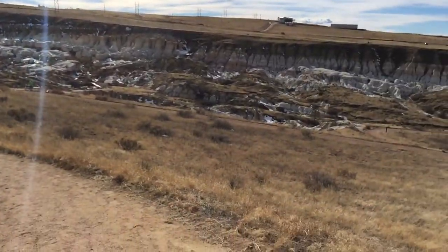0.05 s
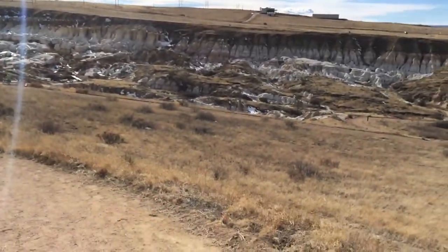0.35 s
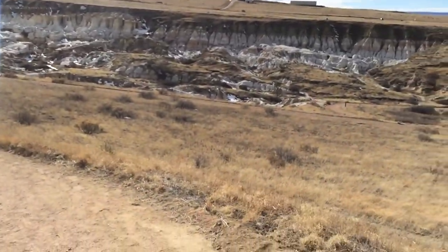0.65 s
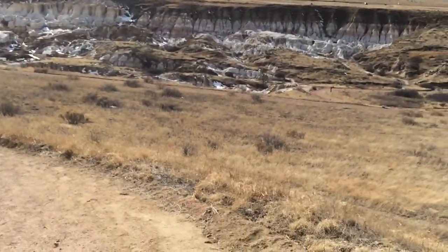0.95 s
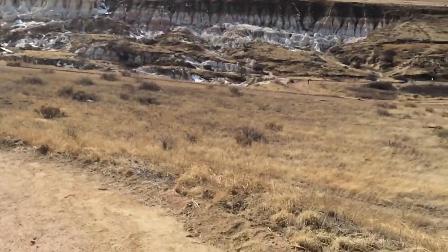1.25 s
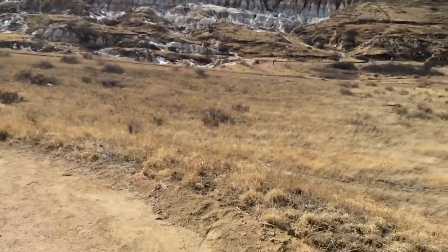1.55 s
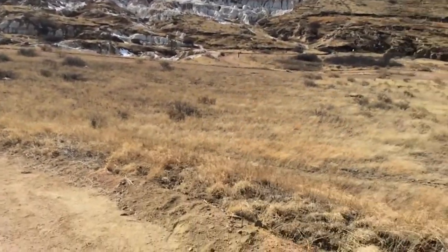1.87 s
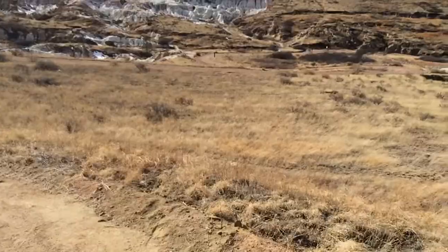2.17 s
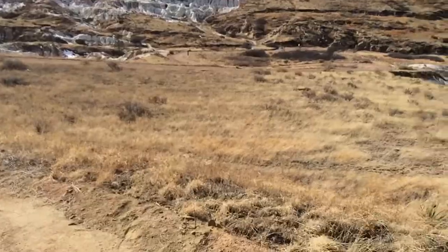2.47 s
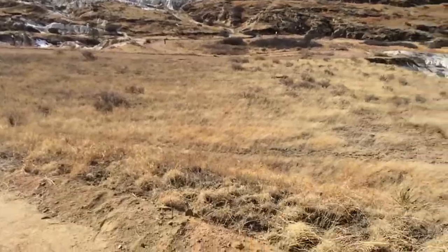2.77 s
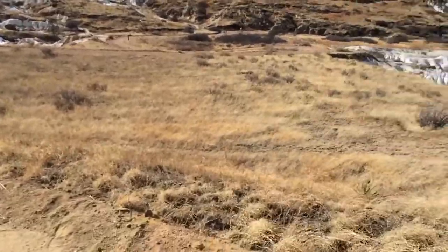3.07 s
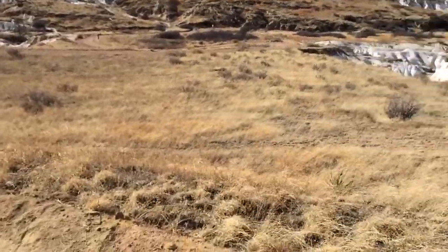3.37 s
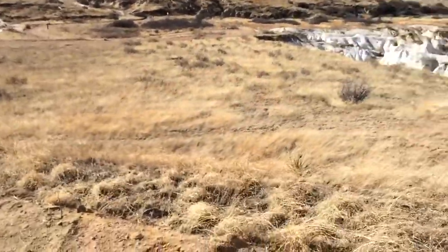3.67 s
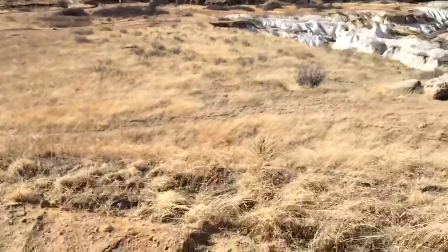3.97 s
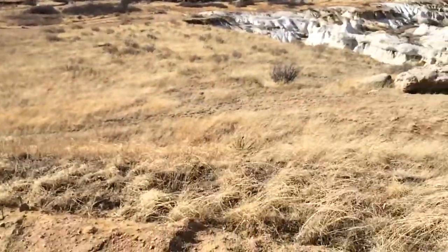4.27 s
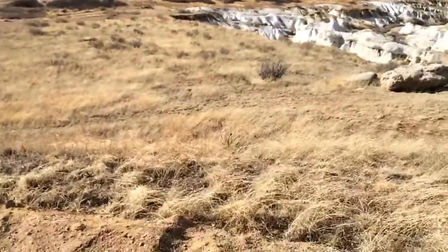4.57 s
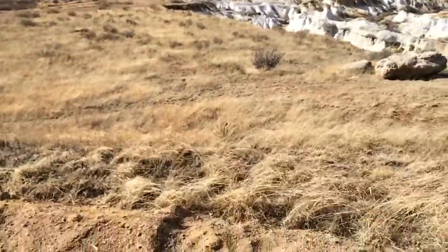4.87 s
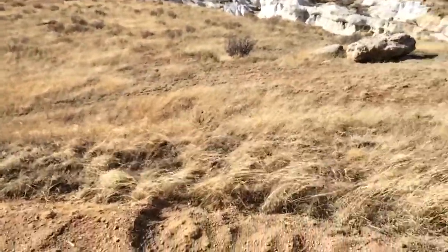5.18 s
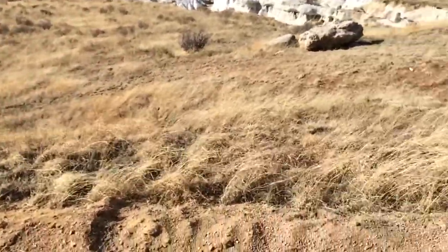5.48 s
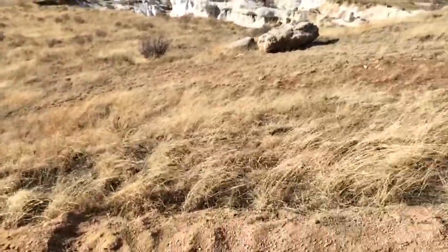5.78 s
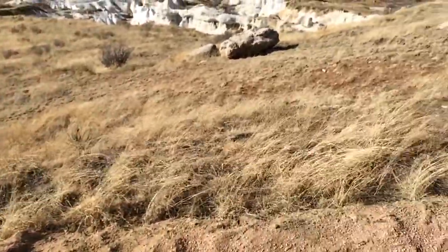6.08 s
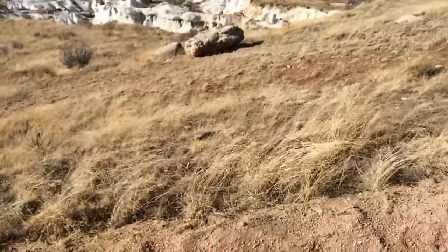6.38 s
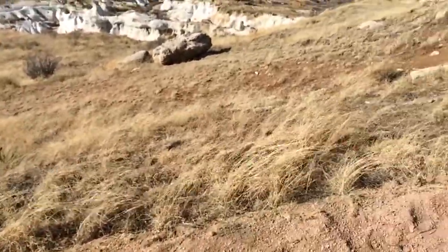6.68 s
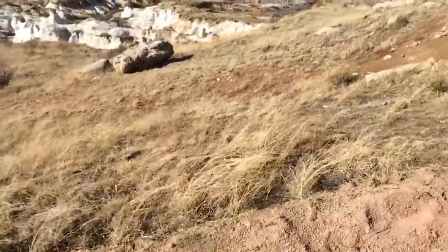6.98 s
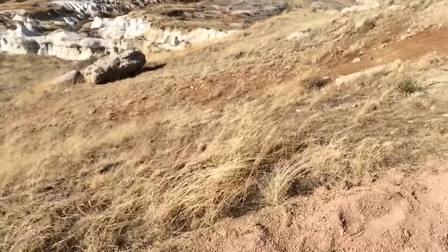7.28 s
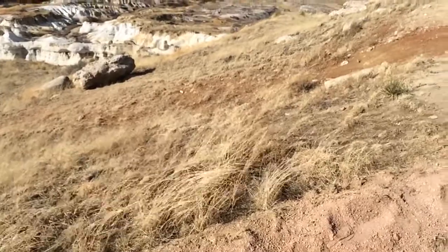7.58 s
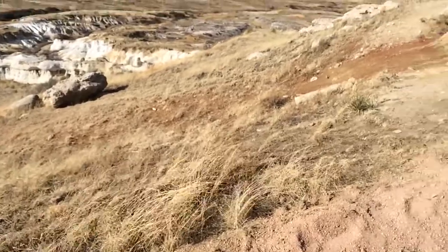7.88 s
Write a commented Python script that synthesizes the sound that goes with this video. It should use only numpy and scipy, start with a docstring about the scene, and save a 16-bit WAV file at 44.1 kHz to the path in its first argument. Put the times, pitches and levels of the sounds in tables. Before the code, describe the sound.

Strong wind on an open grassy hillside buffets a small camera microphone for about eight seconds. From the start, irregular gusts make a low rumble and rough churning, broken by short thuds and slaps. A softer airy hiss runs underneath, with a very faint rustle of dry grass. From about 2 to 4.5 seconds the churning eases and the wind is mostly deep rumble with a few booming lumps. At about 3.6 seconds a faint, breathy whistle rises and falls once. Hard thumps return around 5 seconds. Near 5.7 seconds the wind turns to hit the microphone head-on: the hiss drops and the sound becomes a louder, brighter, ragged tearing that continues to the end. The hardest gusts in this last part overload the microphone slightly, adding a faint crackling rasp.

```python
"""Strong wind on an open grassy hillside blows across the port (opening) of a small camera microphone.
From the start, eddies (swirls of air) rumble and thud, air hisses in the port and grass rustles faintly.
At about 3.6 s the air catches an edge and whistles once. Near 5.7 s the wind turns to meet the port
head-on: the hiss drops and the wind tears at the port to the end, with a faint rasp where the hardest
gusts overload the microphone. All along, the recorder's limiter turns down the loudest peaks."""
import sys
import numpy as np
from scipy import signal
from scipy.fft import rfft, irfft, next_fast_len
from scipy.io import wavfile
from scipy.ndimage import uniform_filter1d, minimum_filter1d, map_coordinates

SR = 44100
rng = np.random.default_rng(int(sys.argv[2]) if len(sys.argv) > 2 else 0)


def dump(signal):
    """Clip the signal to [-1, 1] and save it as 16-bit WAV at the path in sys.argv[1]."""
    limited = np.clip(np.atleast_2d(signal).T, -1, 1)
    pcm = np.round(limited * 32767).astype(np.int16)
    wavfile.write(sys.argv[1], SR, pcm)


N = 358974
TIME = np.arange(N) / SR

# Levels in the tables are relative: the functions scale them further.
# The steady breeze: time_s, hiss_db, grass_db
BREEZE_LEVELS = [(0, -42, -74), (.15, -41, -73), (.55, -34, -66), (.75, -36, -69), (1.15, -30.5, -57.5),
                 (1.35, -36, -65), (1.9, -35.5, -68.5), (2.25, -31.5, -65), (2.7, -34, -66),
                 (2.82, -38, -63.5), (3.17, -37, -63.5), (3.27, -33, -64.5), (3.7, -34.5, -58),
                 (4.05, -34.5, -61.5), (4.22, -40, -67), (4.55, -34.5, -61), (5.2, -41, -69.5)]
# The note of air catching an edge: time_s, pitch_hz, level_db
WHISTLE_NOTE = [(3.52, 3150, -66), (3.6, 3400, -57), (3.64, 3850, -48), (3.68, 3300, -44.5),
                (3.75, 2800, -52), (3.82, 2700, -75)]
# Gusts that strike the port: start_s, length_s, rumble_db, turbulence_db
PORT_GUSTS = [(0, 0.28, -20.5, -20), (0.284, 0.2, -15, -17.5), (0.513, 0.18, -18.0, -19.5),
              (0.817, 0.044, -18, -18), (0.883, 0.105, -13, -22), (1.037, 0.266, -15.5, -18.0),
              (1.308, 0.055, -24, -22.5), (1.53, 0.17, -17, -18), (1.784, 0.21, -18.5, -19),
              (2.173, 0.17, -17.0, -27), (2.516, 0.09, -16.5, -34), (2.633, 0.22, -16.0, -30),
              (2.966, 0.23, -14.5, -31), (3.206, 0.12, -16.5, -33), (3.387, 0.12, -14.5, -33),
              (3.504, 0.1, -16.5, -42), (3.926, 0.028, -14, -34), (4.018, 0.32, -15.0, -29.5),
              (4.444, 0.13, -18, -23.5), (4.626, 0.1, -17, -23), (4.88, 0.14, -14.5, -20.5),
              (5.158, 0.16, -26, -22), (5.319, 0.037, -12, -13), (5.438, 0.078, -24, -17),
              (5.529, 0.047, -34, -16.5), (5.633, 0.058, -27, -16.5), (5.734, 0.067, -15.5, -16.0),
              (5.851, 0.18, -20.0, -15.5), (6.077, 0.025, -24.0, -11), (6.146, 0.21, -28, -15.5),
              (6.367, 0.459, -18, -13.5), (6.88, 0.051, -14, -15.5), (6.946, 0.16, -22, -13),
              (7.175, 0.22, -14.5, -13.5), (7.426, 0.11, -21, -15.0), (7.539, 0.279, -19.5, -17),
              (7.847, 0.093, -15, -15.5), (7.956, 0.25, -21.5, -19.5)]
# Moments when the microphone overloads: start_s, length_s, level_db
OVERLOADS = [(1.242, 0.027, -56), (5.859, 0.027, -58), (5.911, 0.03, -60), (6.013, 0.031, -59.5),
             (6.074, 0.014, -61), (6.379, .055, -63.5), (6.5, .16, -58), (6.677, .07, -52),
             (6.837, .045, -62), (6.903, .03, -61.5), (6.971, 0.035, -48.5), (7.206, 0.098, -60.5),
             (7.349, 0.046, -56), (7.419, .075, -56.5), (7.561, .032, -60), (7.873, .041, -52.5),
             (8.008, .09, -58.5)]
# Big slow eddies that boom: peak_s, level_db
BIG_EDDIES = [(.445, -15.5), (1.075, -15), (1.121, -13), (1.96, -9), (2.202, -3), (2.69, -15.5),
              (3.07, -14), (3.28, -4.5), (3.429, -7), (4.12, -6.5), (4.312, -10), (5.018, -3), (5.346, -11),
              (6.386, -11), (6.56, -2.5), (7.41, -8), (7.9, -15.5)]
# Single hard eddies: start_s, level_db, slap_db (compared with the thud)
HARD_EDDIES = [(0.254, -10.5, 9.5), (.329, -15.5, 15), (0.419, -10.5, -17), (.458, -7, -7.5),
               (0.602, -12.5, -3), (1.129, -11.5, -2), (1.25, -5, -3), (1.575, -10, -1.5),
               (1.928, -10.5, -0.5), (4.879, -9.5, -7), (4.959, -8.5, -10), (5.002, -16.5, -21),
               (5.145, -14.5, 21), (5.332, -6, 14), (5.457, -9, 5), (5.634, -13, 4), (5.664, -9.5, 2),
               (5.68, -8, 6), (5.917, -10.5, 6.5), (6.147, -12, 4), (6.716, -7, 14), (6.894, -5.5, 18.5),
               (7.168, -19, 12), (7.192, -18, 4), (7.225, -7, -0.5), (7.543, -8, -5), (8.006, -9, 15)]

# Each tone table below says how strong a noise is from low to high pitch.
# Grass blades brushing: pitch_hz, level_db
GRASS_TONE = [(1500, -20), (3200, 5), (4200, -3.5), (6000, -14), (9000, -24), (15000, -34.5)]
# Air flowing in the port: pitch_hz, level_db
HISS_TONE = [(100, -1.5), (450, -5), (900, -0.5), (1350, -0.5), (1750, 3.5), (1950, -2), (2250, -12),
             (2600, -20.5), (3250, -19), (4200, -33.5), (6000, -55.5), (10000, -61), (15500, -75)]
# Overload ticks: pitch_hz, level_db
RASP_TONE = [(1500, -12), (3500, 12), (5500, 5), (8000, -7), (12000, -17.5), (16000, -22)]
# Big eddies pushing: pitch_hz, level_db
RUMBLE_TONE = [(15, -42.5), (28, -22.5), (55, -1), (90, 1.5), (160, -3), (250, -13.5), (420, -35),
               (900, -50), (3000, -120)]
# The dull part of a hard eddy: pitch_hz, level_db
THUD_TONE = [(30, -15), (70, -11.5), (200, 3), (400, -1), (700, -11), (1400, -33.5), (4000, -120)]
# The bright part of a hard eddy: pitch_hz, level_db
SLAP_TONE = [(100, -11), (350, 5.5), (750, 2), (1300, -9.5), (1900, -11.5), (2400, -34), (3300, -39.5),
             (4500, -51), (9000, -120)]
# Weak turbulence (rough, tumbling air): pitch_hz, level_db
THRUM_TONE = [(60, -14), (130, -1), (230, 2.5), (350, 1), (520, -16.5), (1000, -31.5), (3000, -100)]
# Stronger turbulence: pitch_hz, level_db
CHURN_TONE = [(60, -25.5), (150, -0.5), (270, 3), (430, 0.5), (680, -7), (1200, -20.5), (1900, -33),
              (2600, -52.5), (6000, -120)]
# The hardest turbulence: pitch_hz, level_db
TEAR_TONE = [(60, -17.5), (200, 3.5), (450, 1.5), (950, -2.5), (1450, -8), (1900, -8), (2350, -23.5),
             (3200, -30), (4200, -45.5), (6000, -68.5), (10000, -78.5), (16000, -120)]

CALM_RUMBLE_DB, CALM_CHURN_DB, DRIFT_DB = -24.5, -28.5, 2  # wind left between gusts, and its drift
TURN_AT_S, TURN_PACE_S = 5.73, 0.28  # the wind swings round to head-on
HEAD_ON_CHURN_DB, HEAD_ON_HISS_DB = 7, -15.5  # head-on: more churn between gusts, less hiss
CHURNS_ABOVE_DB, TEARS_ACROSS_DB, TEARS_HEAD_ON_DB = -27, -7.5, -20  # where turbulence changes tone
STALL_DB, STALL_S = -6, 0.007  # the flow stalls just before a hard eddy hits
HISS_FOLLOWS, GRASS_FOLLOWS = 0.06, 0.08  # share of a gust's rise in dB that each follows
HISS_WAVER_DB, FLURRY_DB = 1.35, 0.5  # chance changes in the hiss and in the grass
CEILING, TOP_HZ = 0.7, 15800  # the limiter's peak level, and the highest pitch kept


def amp(db):
    """Turn decibels into a gain, a number to multiply a sound by."""
    return 10 ** (np.asarray(db) / 20)


def unit(x):
    """Scale a signal to an average strength (rms) of 1."""
    return x / np.sqrt(np.mean(x ** 2) + 1e-20)


def curves(rows):
    """Join a table's points with lines: one curve for each column after the time."""
    times, *columns = np.transpose(rows)
    return [np.interp(TIME, times, column) for column in columns]


def wobble(rate):
    """A smooth curve through random points, rate of them a second."""
    return map_coordinates(rng.standard_normal(int(N * rate / SR) + 4), [TIME * rate])


def noise(tone, size=N):
    """Noise of strength 1, shaped by a tone table."""
    padded = next_fast_len(size + 8192)
    hz, db = np.transpose(tone)
    gain = amp(np.interp(np.log(np.fft.rfftfreq(padded, 1 / SR) + 1), np.log(hz), db))
    return unit(irfft(rfft(rng.standard_normal(padded)) * gain, padded)[:size])


def lumps(rate, depth_db):
    """An uneven gain: eddies pass, rate a second, with the extremes rounded off."""
    return unit(amp(depth_db * 2 * np.tanh(wobble(rate) / 2)))


def sputter(rate, life_s, spread_db, steady):
    """A flickering gain: tiny random strikes, rate a second, on top of a steady share."""
    when, size = rng.random((2, 4000))[:, :int(rate * N / SR)]
    strikes = np.bincount((when * N).astype(int), amp(spread_db * size) ** 2, N)
    age = TIME[:SR // 20] / life_s
    power = np.abs(signal.fftconvolve(strikes, np.square(age * np.exp(-age)))[:N])
    return np.sqrt(steady + (1 - steady) * power / power.mean())


def singing(pitch_hz, width_hz):
    """A breathy note: a narrow band of noise around a moving pitch."""
    phase = 2 * np.pi * np.cumsum(pitch_hz) / SR
    return unit(wobble(width_hz) * np.cos(phase) + wobble(width_hz) * np.sin(phase))


def swell(start, length, attack_s, release_s):
    """A gain that rises around the start, holds, and falls around the end."""
    rise = 1 + np.tanh((TIME - start) / attack_s)
    fall = 1 + np.tanh((start + length - TIME) / release_s)
    return 0.22 * rise * fall


def beyond(force, threshold_db, width_db):
    """A share that grows from 0 to 1 as the force passes a threshold."""
    return 1 / (1 + np.exp((threshold_db - 20 * np.log10(force)) / width_db))


def head_on():
    """0 while the wind blows across the port, 1 once it blows straight in."""
    return 0.5 + 0.5 * np.tanh((TIME - TURN_AT_S) / TURN_PACE_S)


def gusts():
    """Gust follows gust: one gain for the rumble and one for the turbulence."""
    low, rough = np.zeros((2, N))
    for start, length, rumble_db, turbulence_db in PORT_GUSTS:
        shape = swell(start, length, attack_s=0.0046, release_s=0.011)
        low += amp(rumble_db) * shape
        rough += amp(turbulence_db) * shape
    stalls = sum(np.exp(-np.square((TIME - start) / STALL_S + 0.5)) for start, _, _ in HARD_EDDIES)
    return low, rough * amp(STALL_DB * stalls)


def rise_db(gust):
    """How far a gust lifts the wind above its calm level."""
    return 20 * np.log10(1 + gust / amp(CALM_CHURN_DB))


def grass(gust):
    """Dry blades brush each other in a faint, grainy rustle that comes in flurries."""
    _, level_db = curves(BREEZE_LEVELS)
    flurry_db = GRASS_FOLLOWS * rise_db(gust) + FLURRY_DB * wobble(rate=15)
    return amp(level_db + flurry_db - 0.1) * noise(GRASS_TONE) * lumps(rate=200, depth_db=1.7)


def rasp(gust):
    """The overloaded microphone ticks in tight clusters, with a few strays in head-on gusts."""
    clusters = sum(amp(db) * swell(start, length, attack_s=0.0037, release_s=0.0045)
                   for start, length, db in OVERLOADS)
    strays = amp(-59) * gust * head_on()
    ticks = noise(RASP_TONE) * sputter(rate=140, life_s=0.00009, spread_db=14.5, steady=0.008)
    return amp(4.5) * (clusters + strays) * ticks


def whistle():
    """Air catches an edge and sings a breathy note that rises and falls."""
    pitch_hz, level_db = curves(WHISTLE_NOTE)
    sounding = (TIME > WHISTLE_NOTE[0][0]) & (TIME < WHISTLE_NOTE[-1][0])
    return amp(level_db) * singing(pitch_hz, width_hz=600) * sounding


def airstream(gust):
    """Air hisses in the port and makes it ring softly; faster air is louder and a little higher."""
    flow_db, _ = curves(BREEZE_LEVELS)
    speed = amp(0.08 * (flow_db + 34.5))
    # Reading through the noise faster raises its pitch.
    hiss = map_coordinates(noise(HISS_TONE, size=2 * N), [np.cumsum(speed)], order=5, mode="wrap")
    ring_hz = 1800 * speed * (1 + 0.055 * wobble(rate=14))
    ring = singing(ring_hz, width_hz=160)
    surge_db = HISS_FOLLOWS * rise_db(gust) + HISS_WAVER_DB * wobble(rate=9.2)
    level_db = flow_db + surge_db + HEAD_ON_HISS_DB * head_on()
    return amp(level_db + 2.5) * (hiss + amp(-10) * ring) * lumps(rate=61, depth_db=1.8)


def rumble(gust, boom_s=0.0084):
    """Big eddies push in low lumps on the diaphragm, the thin skin inside the microphone."""
    calm = amp(CALM_RUMBLE_DB + DRIFT_DB * wobble(rate=8))
    booms = sum(amp(db) * np.exp(-np.square((TIME - peak) / boom_s)) for peak, db in BIG_EDDIES)
    rolling = amp(-0.15) * np.hypot(gust, calm) * lumps(rate=32, depth_db=2.5)
    return np.hypot(rolling, booms) * noise(RUMBLE_TONE)


def buffets(pace_s=0.0021):
    """Each hard eddy swells within milliseconds, thuds and slaps, and is gone."""
    thud, slap, out = noise(THUD_TONE), noise(SLAP_TONE), np.zeros(N)
    age = TIME[:SR // 20] / pace_s
    shape = np.square(age) * np.exp(-age)
    shape /= shape.max()
    for start, level_db, slap_db in HARD_EDDIES:
        span = round(start * SR) + np.arange(len(age))
        blow = (thud[span] + amp(slap_db) * slap[span]) * shape
        out[span] += amp(level_db) * blow * np.linalg.norm(shape) / np.linalg.norm(blow)
    return out


def turbulence(gust):
    """Tumbling air thrums when weak, churns when stronger, and at its hardest tears raggedly."""
    facing = head_on()
    calm = amp(CALM_CHURN_DB + HEAD_ON_CHURN_DB * facing + DRIFT_DB * wobble(rate=8))
    force = np.hypot(gust, calm) * lumps(rate=25, depth_db=0.18)
    churning = beyond(force, CHURNS_ABOVE_DB, width_db=5.0)
    # Head-on wind needs less force to tear.
    tears_above_db = TEARS_ACROSS_DB + (TEARS_HEAD_ON_DB - TEARS_ACROSS_DB) * facing
    tearing = beyond(force, tears_above_db, width_db=3.5)
    thrum = amp(0.5) * np.sqrt(1 - churning) * noise(THRUM_TONE)
    churn = np.sqrt(churning) * noise(CHURN_TONE)
    dull = amp(-0.46) * np.sqrt(1 - tearing) * (thrum + churn)
    dull *= sputter(rate=120, life_s=0.0033, spread_db=5.5, steady=0.2)
    bright = amp(2.8) * np.sqrt(tearing) * noise(TEAR_TONE)
    bright *= sputter(rate=240, life_s=0.0013, spread_db=5, steady=0.19) * lumps(rate=31, depth_db=1.0)
    return force * (dull + bright)


def scene():
    """Add up all the sounds of the wind at one microphone."""
    low, rough = gusts()
    wind = rumble(low) + turbulence(rough) + buffets()
    return (wind + rasp(rough) + airstream(rough) + grass(rough) + whistle())[None]


def limiter(x, release_db_per_s, smooth_samples):
    """Turn the sound down smoothly just ahead of a peak, then steadily back up."""
    over_db = 20 * np.log10(np.maximum(np.abs(x) / CEILING, 1))
    recovery_db = release_db_per_s * TIME
    gain = amp(recovery_db - np.maximum.accumulate(over_db + recovery_db, axis=-1))
    early_gain = minimum_filter1d(gain, 2 * smooth_samples)
    return x * uniform_filter1d(uniform_filter1d(early_gain, smooth_samples), smooth_samples)


def record(dry):
    """The recorder limits the peaks, then cuts off the highest treble."""
    limited = limiter(dry, release_db_per_s=1203.0, smooth_samples=15)
    padded = next_fast_len(N + SR // 2)
    kept = np.fft.rfftfreq(padded, 1 / SR) < TOP_HZ
    return irfft(rfft(limited, padded) * kept, padded)[..., :N]


dry = scene()
out = record(dry)
dump(out)
```